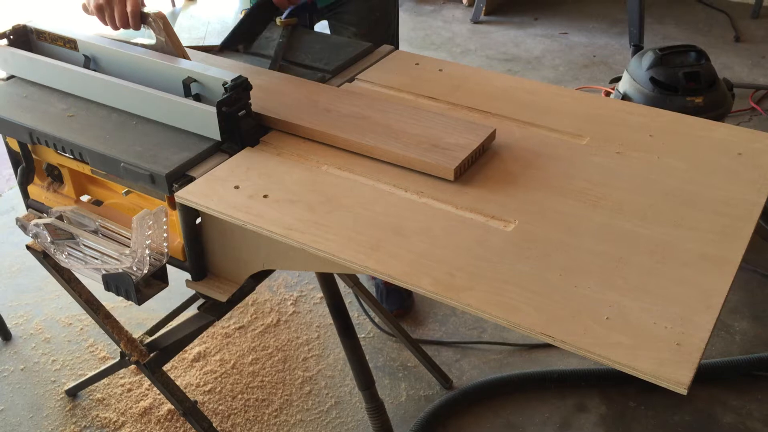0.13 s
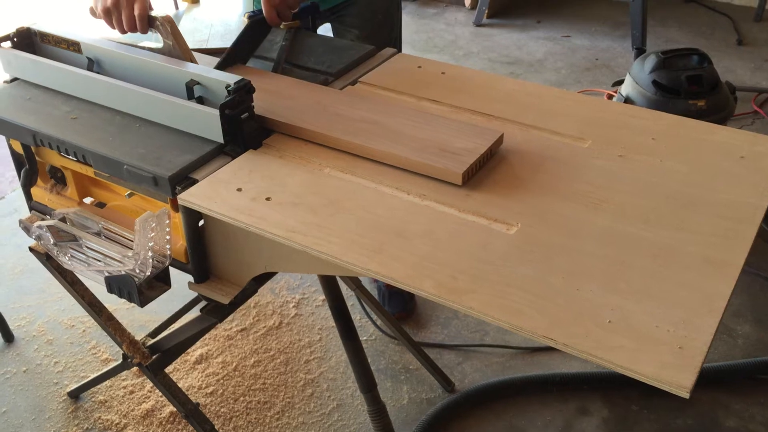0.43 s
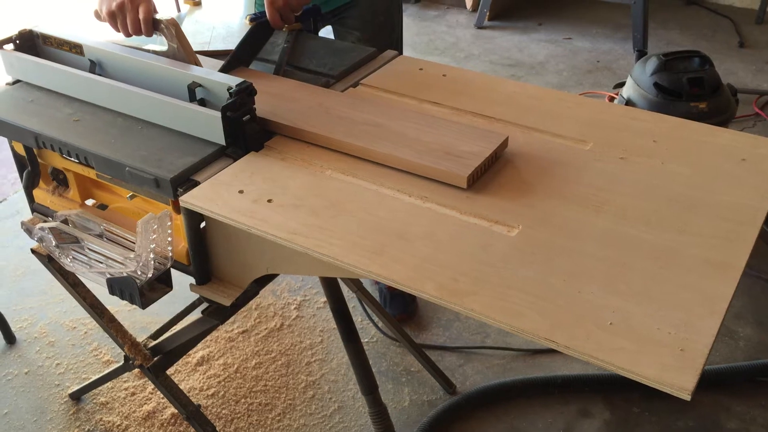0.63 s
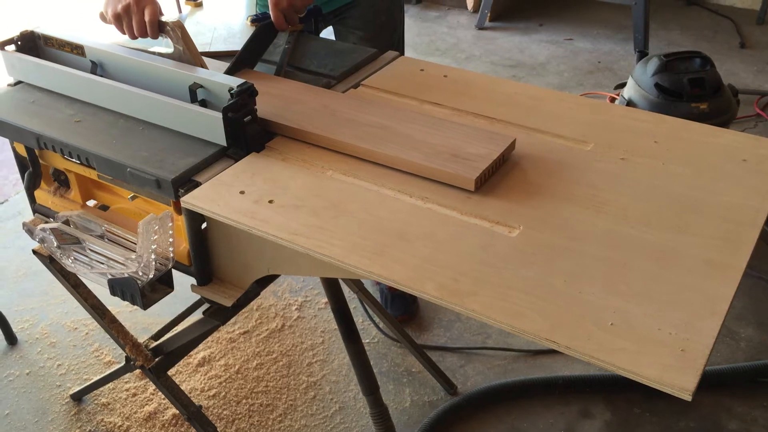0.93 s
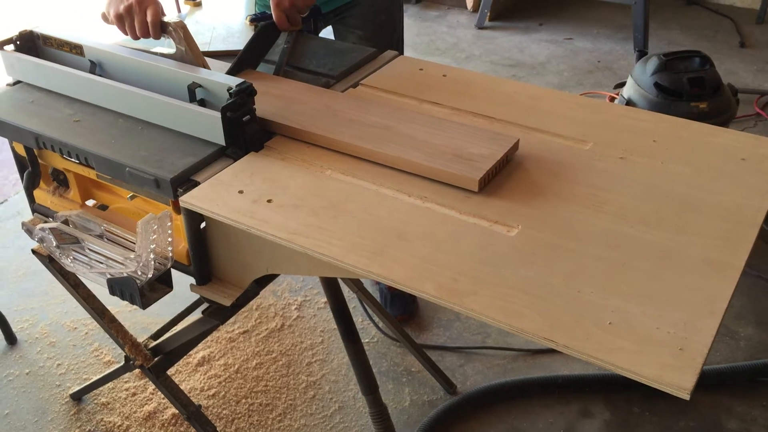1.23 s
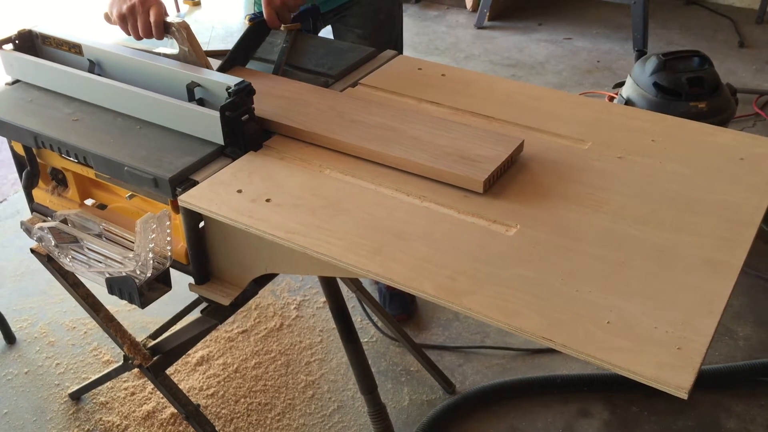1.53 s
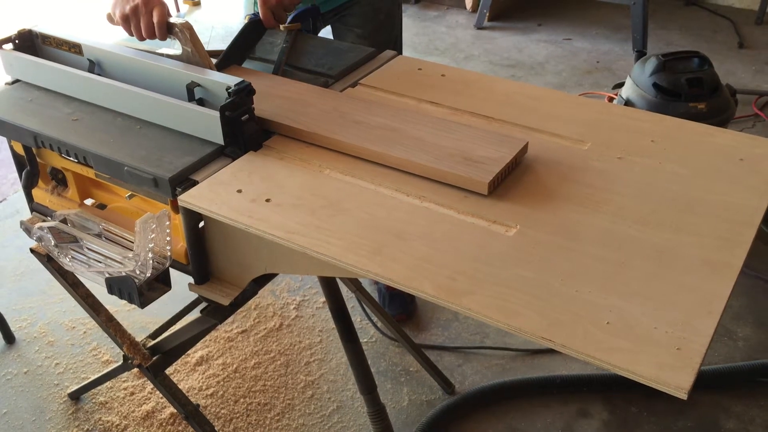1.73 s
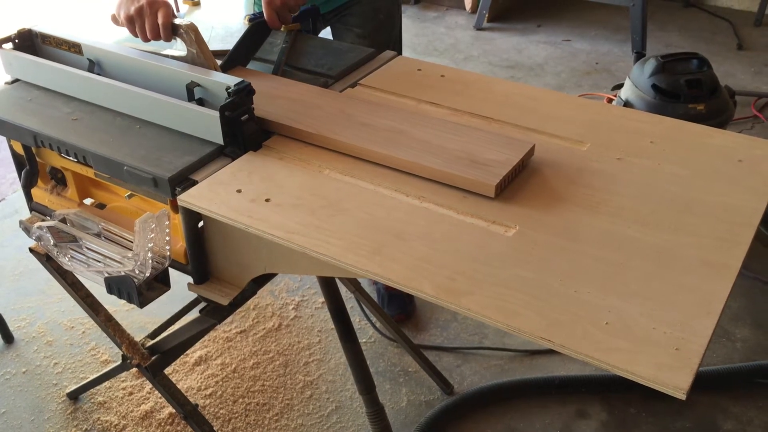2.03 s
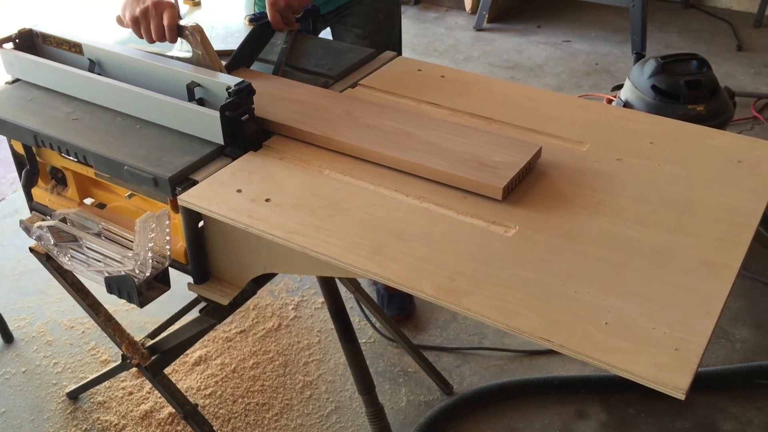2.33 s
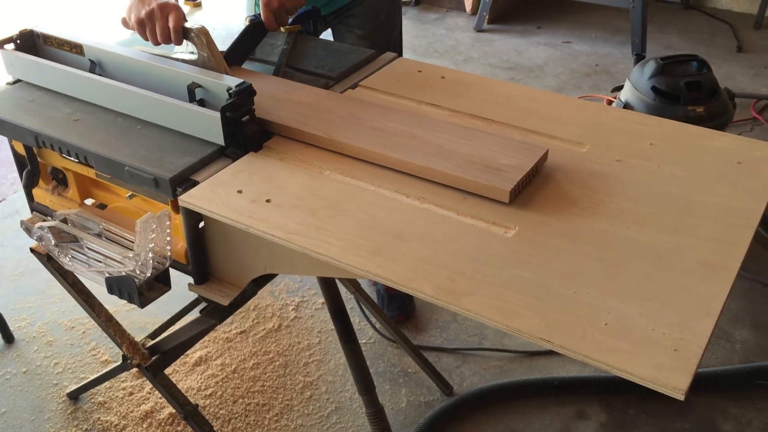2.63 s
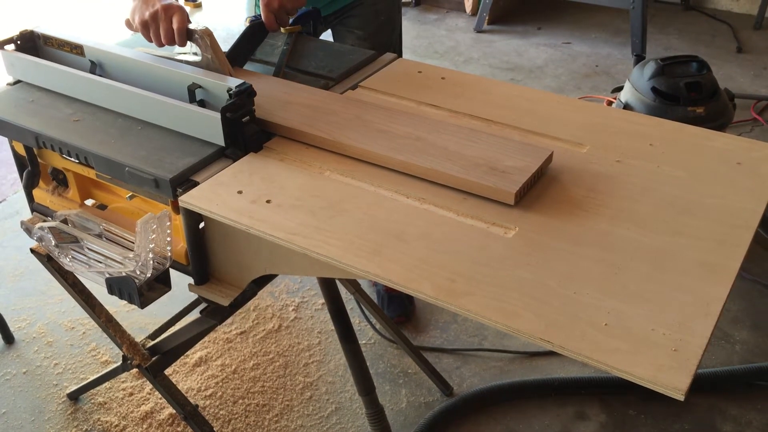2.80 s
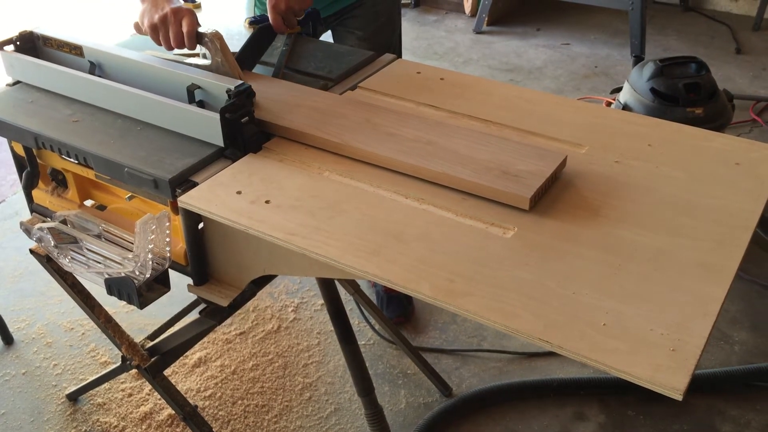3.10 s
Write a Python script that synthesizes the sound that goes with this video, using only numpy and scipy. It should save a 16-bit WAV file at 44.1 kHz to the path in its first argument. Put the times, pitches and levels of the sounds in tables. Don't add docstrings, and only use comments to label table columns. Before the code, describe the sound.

Table saw cutting wood in a small workshop, close microphone, nearly mono: a continuous geared motor whine drifting slightly in pitch, gritty hiss of torn fibres, broad fan roar and steady vacuum hum throughout.

```python
import sys
import numpy as np
from scipy import signal
from scipy.fft import rfft, irfft
from scipy.io import wavfile
from scipy.ndimage import uniform_filter1d

SR = 44100
rng = np.random.default_rng(int(sys.argv[2]) if len(sys.argv) > 2 else 0)


def field_ratio(decibels):
    return 10 ** (np.asarray(decibels, dtype=float) / 20)


def dump_mix(stems):
    frames = np.atleast_2d(stems).T
    limited = np.clip(frames, -1, 1)
    pcm = np.round(limited * 32767).astype(np.int16)
    wavfile.write(sys.argv[1], SR, pcm)


N = 143766


def level(x, db):
    return x * field_ratio(db) / np.sqrt(np.mean(x ** 2))


def walk(rate, count=1):
    hold = int(SR / rate)
    held = np.repeat(rng.standard_normal((count, 120)), hold, axis=1)[:, :N]
    slewed = uniform_filter1d(uniform_filter1d(held, hold), hold)
    return 1.12 * slewed


def control(table, column):
    points = np.array(table)
    return np.interp(np.arange(N) / SR, points[:, 0], points[:, column])


# (time [s], speed [Hz])
SHAFT_SPEED = [(0.13, 354.7), (0.21, 355.5), (0.29, 357.3), (0.57, 366.5), (0.71, 369.8), (0.87, 372.2),
               (1.11, 372.9), (1.19, 374.1), (1.33, 377.7), (1.41, 378.6), (1.71, 378.4), (1.83, 377.2),
               (1.99, 374.7), (2.65, 372.9), (2.75, 373.7), (2.91, 373.7), (3.05, 375.0), (3.26, 382.3)]


def shaft_speed():
    return control(SHAFT_SPEED, column=1)


WANDER_DB, WANDER_PER_S = 0.7, 4.0
FLUTTER_DB, FLUTTER_PER_S = 1.5, 25.0
# (frequency [Hz], width [Hz], level [dB])
PANELS = [(354, 16.3, 7), (3056, 43, 6.5), (3303, 37, 10), (3440, 29, 5), (3560, 48, 2), (3610, 24, -8),
          (3732, 63, 8), (5370, 89, 17), (10000, 60, 4)]


def tones(rows, db, hz, wander_db=WANDER_DB):
    multiple, relative_db = np.array(rows, float).T[:, :, None]
    start = rng.random((len(rows), 1))
    coarse_hz = multiple * hz[::64]
    ring_db = sum(gain / (1 + (2 * (coarse_hz - f) / width) ** 2) for f, width, gain in PANELS)
    ring_db = np.repeat(ring_db, 64, axis=1)[:, :N]
    wander = wander_db * walk(WANDER_PER_S, count=len(rows))
    flutter = FLUTTER_DB * walk(FLUTTER_PER_S, count=len(rows))
    gain = field_ratio(relative_db + db + wander + flutter + ring_db)
    turns = multiple * np.cumsum(hz) / SR + start
    return np.sqrt(2) * np.sum(gain * np.sin(2 * np.pi * turns), axis=0)


GEAR_RATIO = 5.96
# (time [s], gear mesh [dB], armature [dB], bearing [dB], brushes [dB], blade wobble [dB])
MOTOR = [(0.1, -22, -32, -29, -46, -4), (0.3, -28.5, -33, -26.5, -48, -3.5),
         (0.57, -31.5, -29.5, -29, -52, -12), (0.75, -35, -26.5, -30.5, -45, -17),
         (0.95, -28, -24, -29.5, -43, -21), (1.11, -28, -26, -31, -48, -9),
         (1.2, -30, -37.5, -30.5, -45, -3), (1.4, -27.5, -31.5, -28, -45, -11),
         (1.7, -25.5, -35.5, -27, -42, -9), (2.0, -27, -35.5, -29.5, -40, -10),
         (2.3, -25, -30.5, -28.5, -40.5, -11), (2.65, -21.5, -27.5, -29, -36.5, -18),
         (2.91, -26, -25.5, -28, -39, -7), (3.05, -18.5, -32, -26, -37, -21),
         (3.11, -31, -35, -31, -46, -7), (3.24, -23.5, -28, -29, -42, -1.5)]
# (multiple of shaft speed [x], level under the part's control [dB])
MESH = [(6, -1), (3, -12), (2, -20)]
ARMATURE = [(4, 0)]
BEARING = [(8.93, -5.5), (10.054, -7.5), (9.786, -6), (0.999, -11.5), (0.813, -8), (8.64, -11.5),
           (12.75, -37), (26.8, -27), (10.86, -11)]
BRUSHES = [(5, 7), (8, 5.5), (13, -24), (14, -8), (15, -13), (16, -9), (18, -9), (19, -5.5), (20, -19),
           (24, -7), (25, -12), (26, -8), (28, -13), (29, -13), (30, -6), (33, -16), (34, -5), (35, -16),
           (38, -11), (39, -22), (40, -28)]
# (level above [dB], level below [dB])
WOBBLE = (1, -8.5)


def motor(hz):
    out = tones(BRUSHES, control(MOTOR, column=4), hz, wander_db=2.2)
    wobble_db = control(MOTOR, column=5)
    for column, rows in enumerate((MESH, ARMATURE, BEARING[:1]), start=1):
        sides = []
        for multiple, db in rows:
            for sign, side_db in zip((1, -1), WOBBLE):
                sides.append((multiple + sign / GEAR_RATIO, db + side_db))
        part_db = control(MOTOR, column=column)
        out = out + tones(rows, part_db, hz) + tones(sides, part_db + wobble_db, hz)
    return out + tones(BEARING[1:], control(MOTOR, column=3), hz)


# (frequency [Hz], level [dB])
VACUUM = [(119.5, -49), (181, -45), (240, -46), (372, -38), (1117, -42), (1864, -45), (6408, -52),
          (9465, -50), (9745, -53), (10488, -54)]


def vacuum():
    return tones(VACUUM, 0, np.ones(N))


# (frequency [Hz], width [Hz], level [dB])
HOUSING = [(71.5, 8.4, 9), (91, 14, 5), (148, 25, -11.5), (183, 29, 3.5), (217, 18, -11), (380, 110, 1.5),
           (426, 30, 3.5), (536, 114, -7.5), (1316, 83, 3.5), (1730, 340, -5), (2170, 170, 1.5),
           (2360, 170, -3), (3710, 390, 3.5), (9570, 670, 6)]


def colour(x, points):
    hz = np.arange(N // 2 + 1) * SR / N + 1
    curve = np.array(points)
    db = np.interp(np.log(hz), np.log(curve[:, 0]), curve[:, 1])
    db = db + sum(gain / (1 + (2 * (hz - f) / width) ** 2) for f, width, gain in HOUSING)
    return irfft(rfft(x) * field_ratio(db), N)


TEAR_DB = -24.5
SHAFT_GATE, BLADE_GATE = 0.32, 0.14
# (time [s], level [dB])
FEED = [
    (0.1, -28.5),
    (0.3, -26.5),
    (0.8, -24.5),
    (1.4, -26.5),
    (2.0, -26.5),
    (2.9, -29),
    (3.03, -29.5),
    (3.11, -27.5),
    (3.26, -25.5),
]
# (frequency [Hz], level per Hz [dB])
TEAR = [(600, -20), (1500, -1), (3400, 0.5), (5000, -11.5), (9500, -14.5), (15000, -17.5)]


def teeth(turns):
    shaft_pulse = 1 + SHAFT_GATE * np.sin(2 * np.pi * turns)
    blade_pulse = 1 + BLADE_GATE * np.sin(2 * np.pi * turns / GEAR_RATIO)
    feed = field_ratio(control(FEED, column=1) + 1.8 * walk(14)[0])
    hiss = colour(rng.standard_normal(N) * shaft_pulse * blade_pulse, TEAR)
    return level(hiss * feed, TEAR_DB)


SHOP_T60_S, SHOP_DB = 0.31, -3.5


def shop(x):
    t = np.arange(SR // 2) / SR
    tail = rng.standard_normal(len(t)) * field_ratio(-60 * t / SHOP_T60_S)
    tail = tail * (t > 0.004)
    tail = tail / np.sqrt(np.sum(tail ** 2))
    return x + field_ratio(SHOP_DB) * signal.fftconvolve(x, tail)[:N]


ROAR_DB, SWELL_DB, FLICKER_DB = -20.5, 0.2, 1.0
# (frequency [Hz], level per Hz [dB])
ROAR = [(18, -59), (30, -28), (298, -2.5), (529, 1), (1500, -2), (1710, -2.5), (3370, -4), (9570, -22.5),
        (15300, -37.5)]


def fans():
    air = rfft(colour(rng.standard_normal(N), ROAR))
    hz = np.arange(N // 2 + 1) * SR / N + 1
    centres = np.arange(14, 43)
    share = np.clip(1 - np.abs(3 * np.log2(hz) - centres[:, None]), 0, 1)
    flicker = field_ratio(SWELL_DB * walk(4.6) + FLICKER_DB * walk(7.72, count=len(centres)))
    return level(np.sum(irfft(air * share, N) * flicker, axis=0), ROAR_DB)


PATCH_S, PATCH_DB, PATCH_GRID = 0.036, -0.5, 1024
# (time [s], low edge [Hz], high edge [Hz])
PATCHES = [(.14, 6300, 7700), (.28, 11000, 13200), (.30, 6300, 8300), (.63, 10400, 11800),
           (.86, 9700, 11800), (1.02, 4650, 5800), (1.325, 4200, 5300), (1.42, 7600, 9700),
           (1.695, 11700, 13200), (1.695, 8300, 9700), (1.74, 9700, 11100), (1.975, 5700, 7000),
           (2.23, 11700, 13200), (2.23, 4200, 5300), (2.44, 8300, 10400), (2.81, 7600, 9000),
           (2.835, 7600, 9000), (3.02, 7600, 9700), (3.02, 4200, 5300), (3.185, 5700, 7000)]


def stereo_patches(x):
    size = int(PATCH_S * SR)
    side = np.zeros(N)
    hz = np.arange(size // 2 + 1) * SR / size
    for time_s, low_hz, high_hz in PATCHES:
        start = round(time_s * SR / PATCH_GRID) * PATCH_GRID - size // 2
        at = slice(start, start + size)
        band = np.abs(rfft(x[at])) * (hz > low_hz) * (hz < high_hz)
        random_phase = np.exp(2j * np.pi * rng.random(len(hz)))
        side[at] += irfft(band * random_phase, size) * np.hanning(size)
    return field_ratio(PATCH_DB) * side * np.array([[1], [-1]])


def scene():
    hz = shaft_speed()
    turns = np.cumsum(hz) / SR
    mix = motor(hz) + vacuum() + shop(teeth(turns)) + fans()
    return np.array([mix, mix])


def low_pass(x):
    return signal.sosfilt(signal.butter(12, 15330, fs=SR, output="sos"), x)


MIC_LOW_HZ = 62
START_S, FADE_S = 0.0836, 0.001


def record(dry):
    bass_cut = signal.butter(2, MIC_LOW_HZ, "high", fs=SR, output="sos")
    x = signal.sosfilt(bass_cut, dry)
    fade = np.clip((np.arange(N) / SR - START_S) / FADE_S, 0, 1)
    mix = (x + stereo_patches(x[0])) * fade
    return low_pass(mix)


dry = scene()
out = record(dry)
dump_mix(out)
```